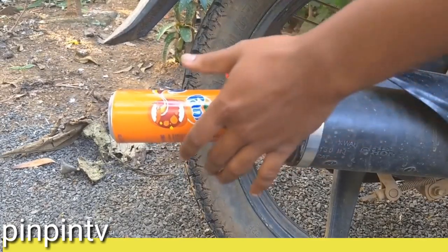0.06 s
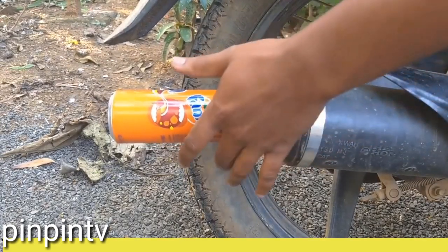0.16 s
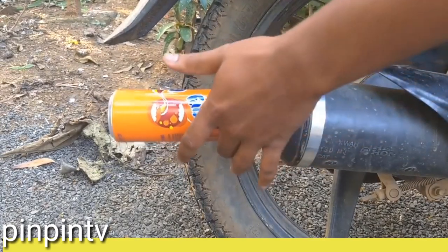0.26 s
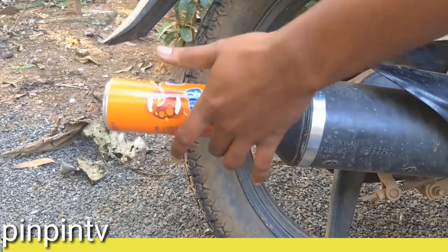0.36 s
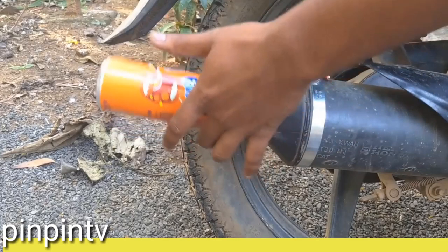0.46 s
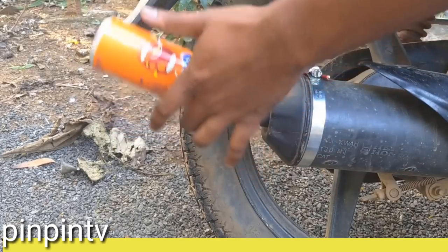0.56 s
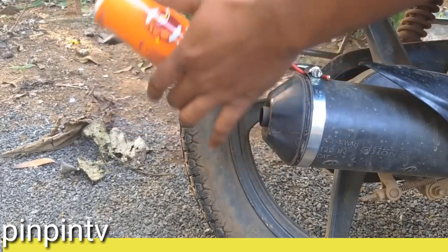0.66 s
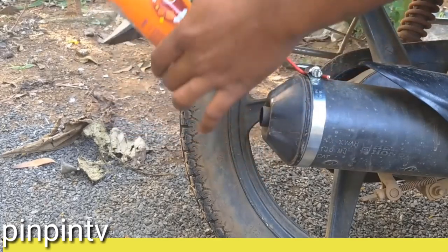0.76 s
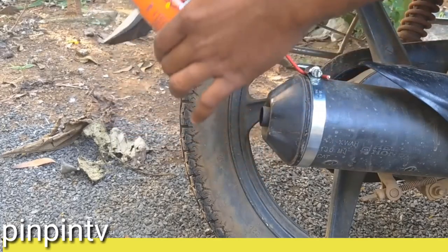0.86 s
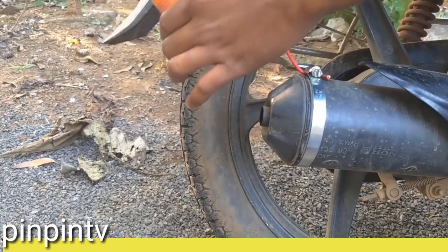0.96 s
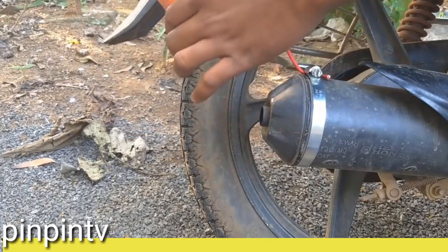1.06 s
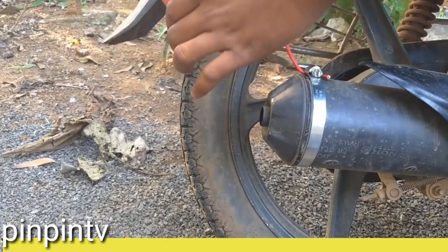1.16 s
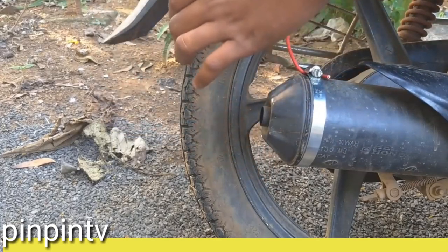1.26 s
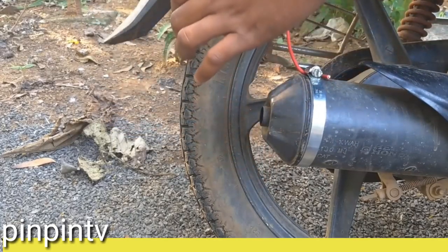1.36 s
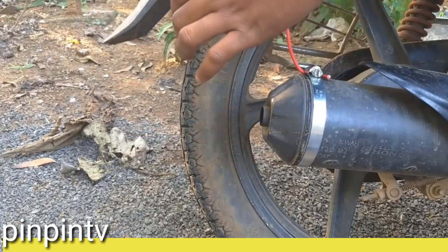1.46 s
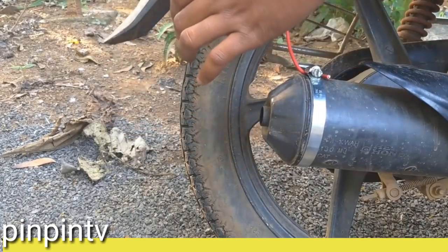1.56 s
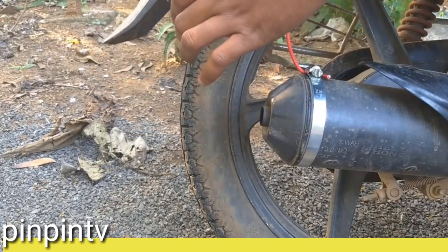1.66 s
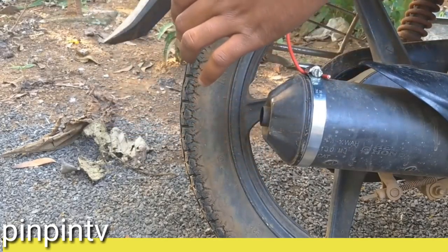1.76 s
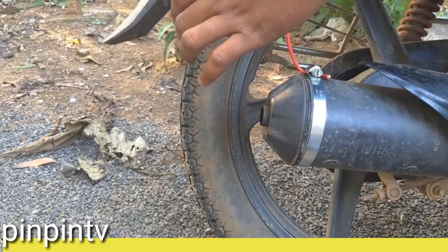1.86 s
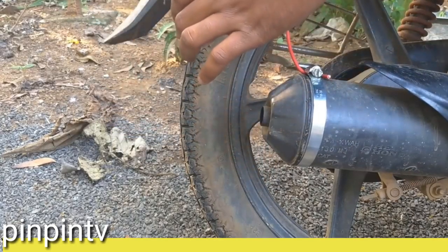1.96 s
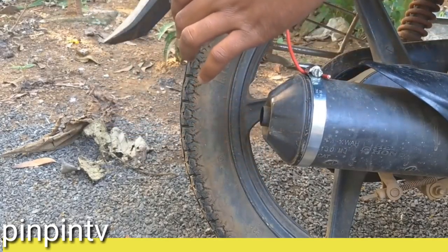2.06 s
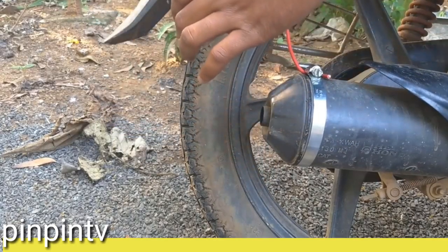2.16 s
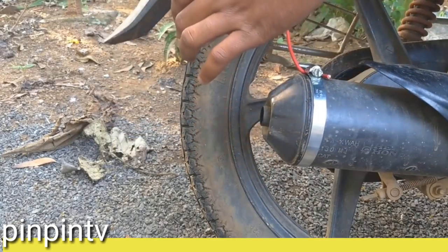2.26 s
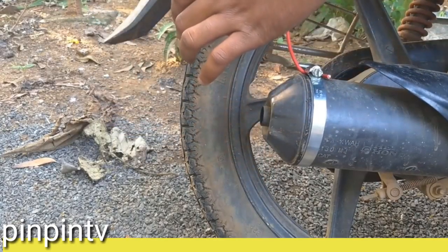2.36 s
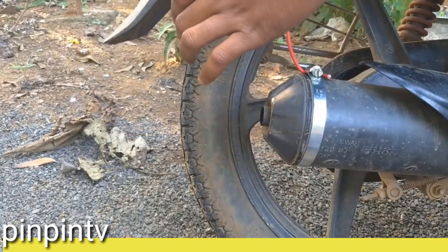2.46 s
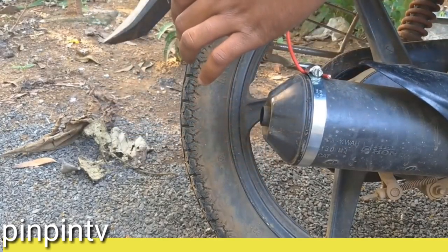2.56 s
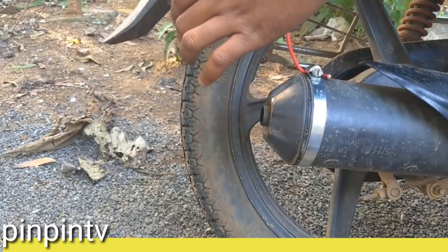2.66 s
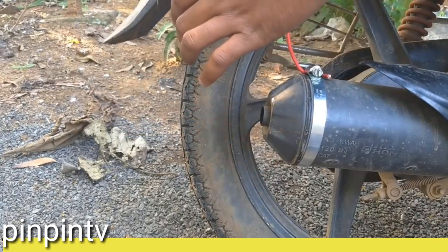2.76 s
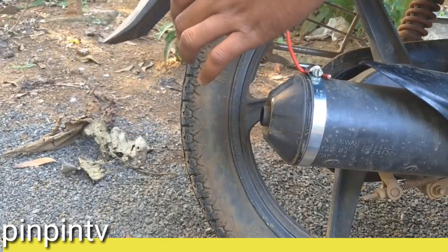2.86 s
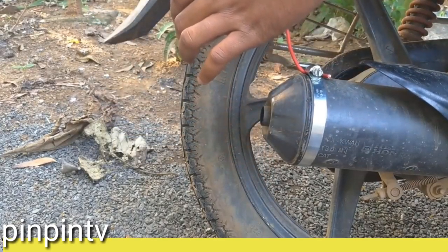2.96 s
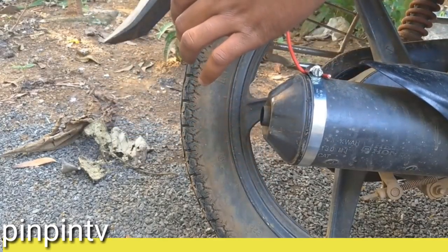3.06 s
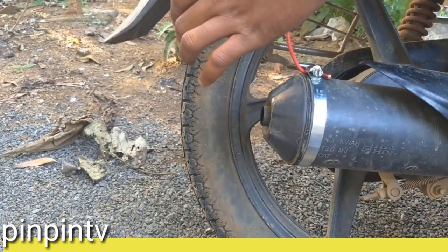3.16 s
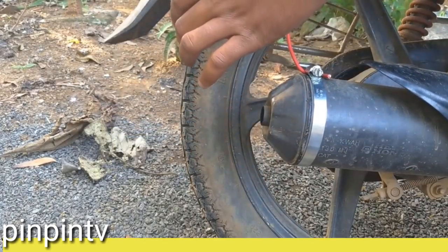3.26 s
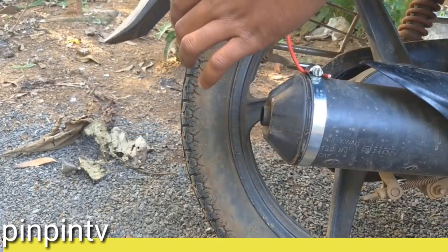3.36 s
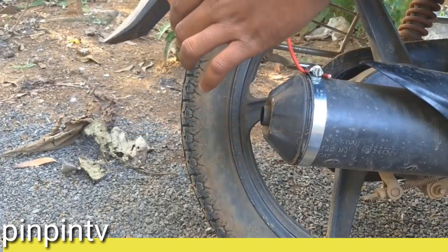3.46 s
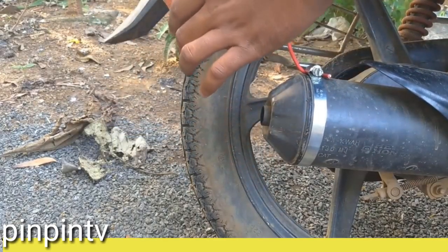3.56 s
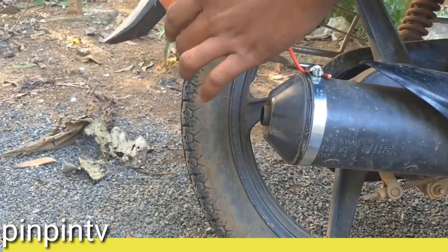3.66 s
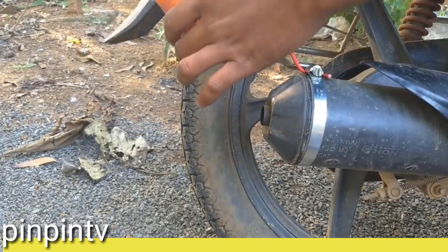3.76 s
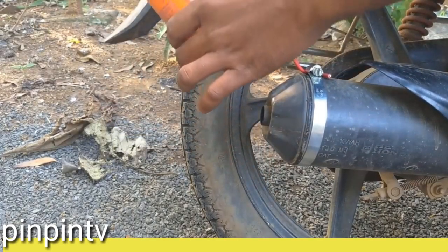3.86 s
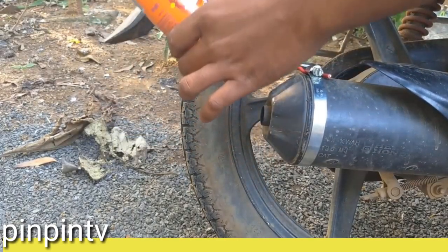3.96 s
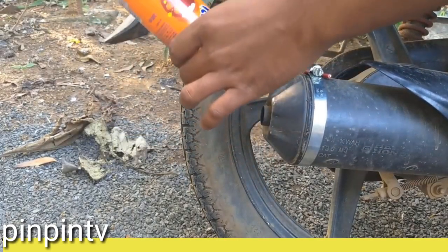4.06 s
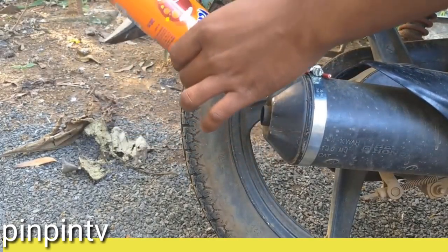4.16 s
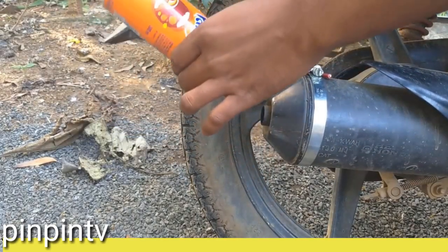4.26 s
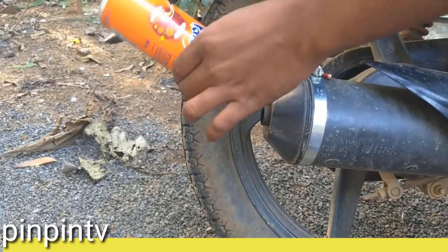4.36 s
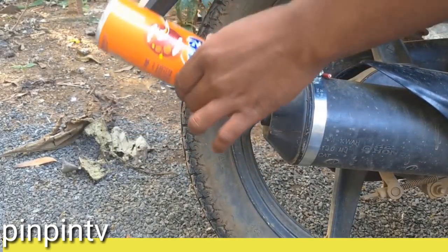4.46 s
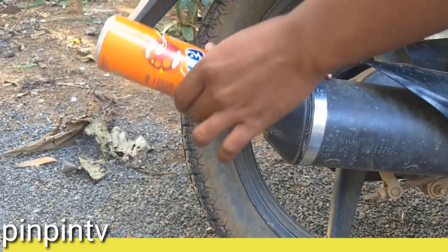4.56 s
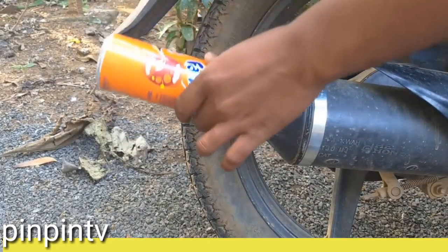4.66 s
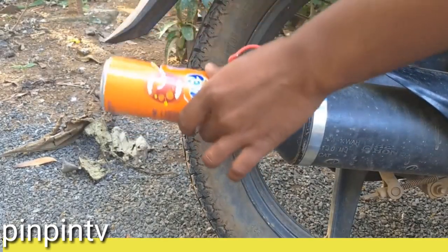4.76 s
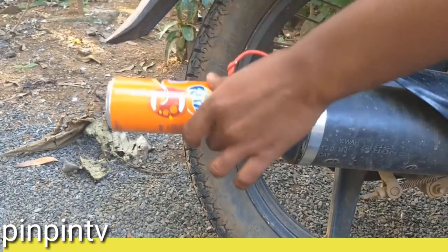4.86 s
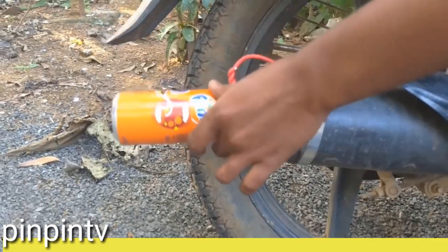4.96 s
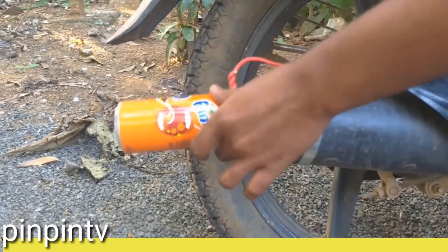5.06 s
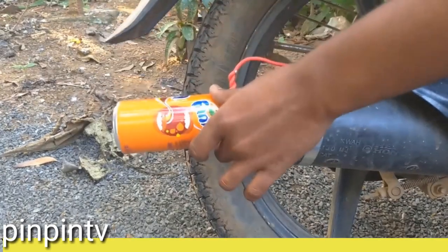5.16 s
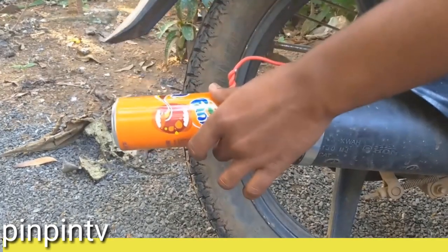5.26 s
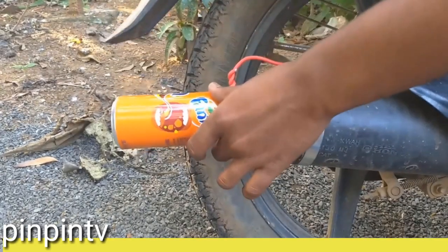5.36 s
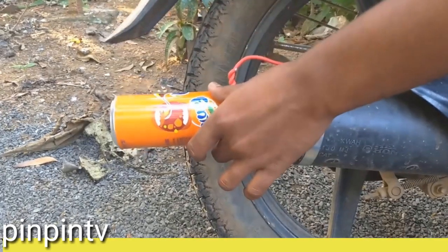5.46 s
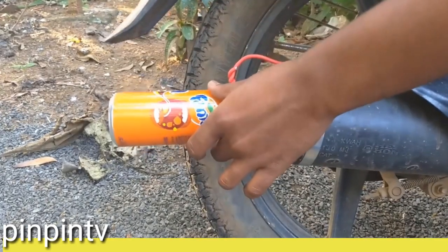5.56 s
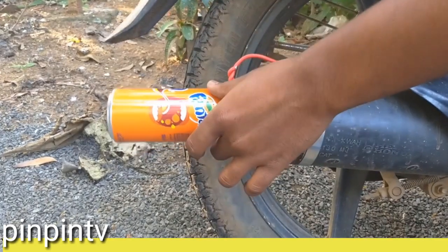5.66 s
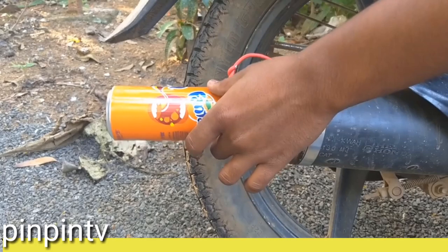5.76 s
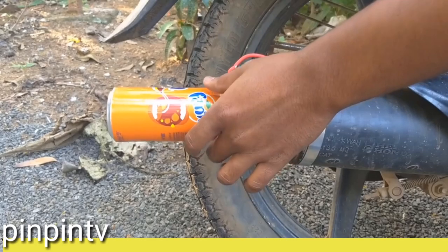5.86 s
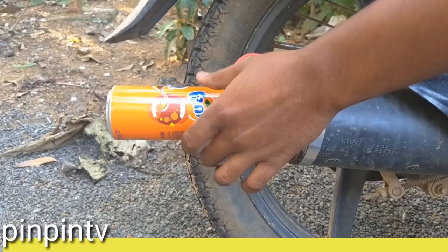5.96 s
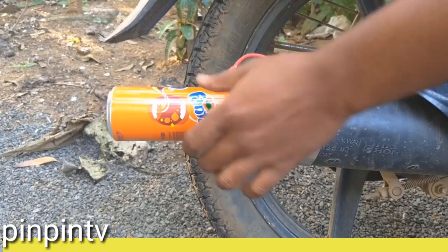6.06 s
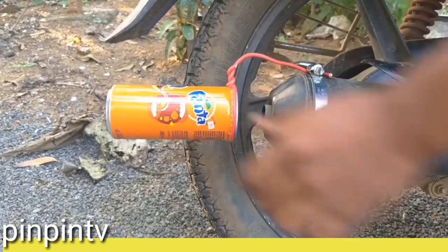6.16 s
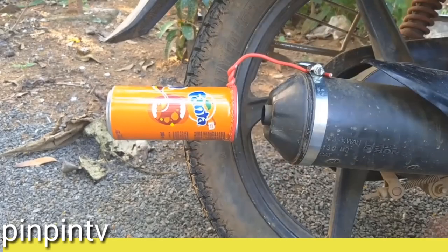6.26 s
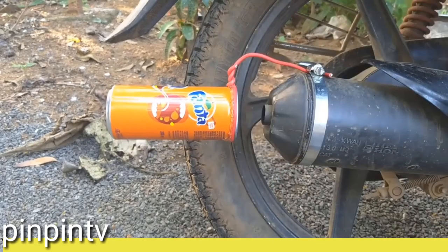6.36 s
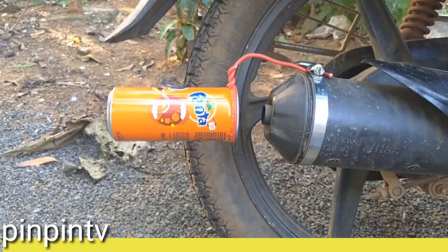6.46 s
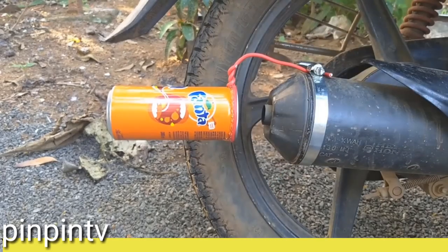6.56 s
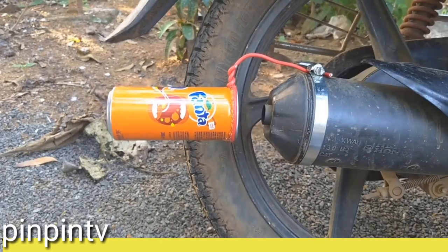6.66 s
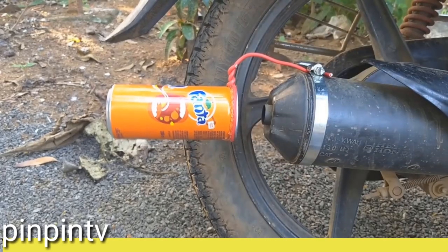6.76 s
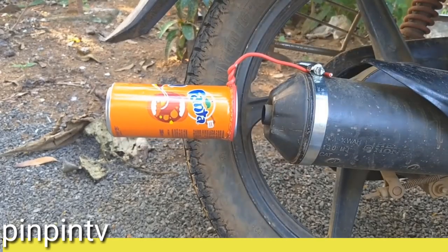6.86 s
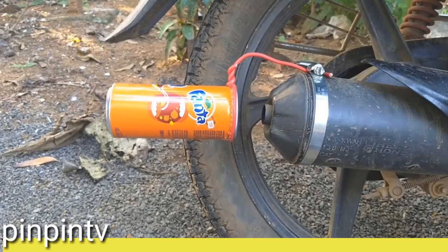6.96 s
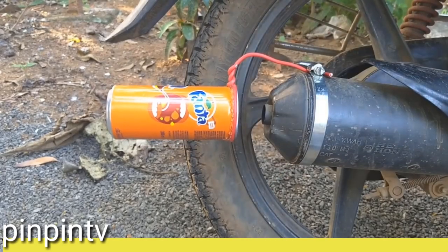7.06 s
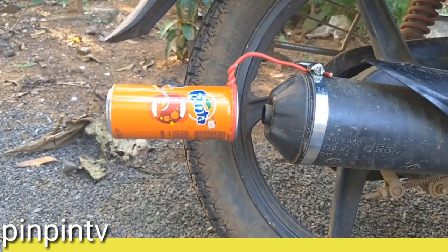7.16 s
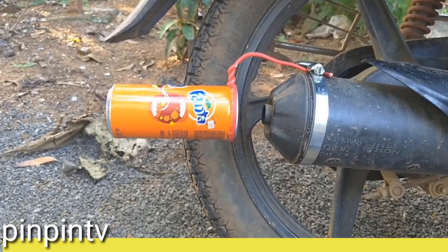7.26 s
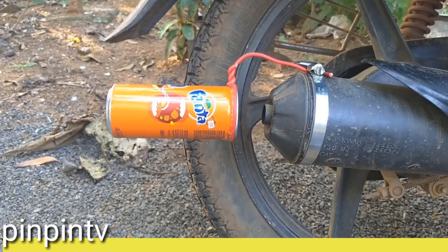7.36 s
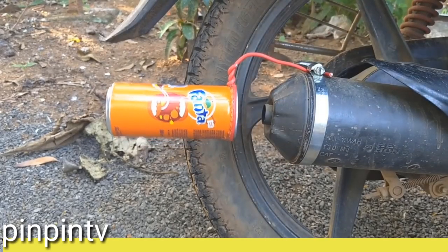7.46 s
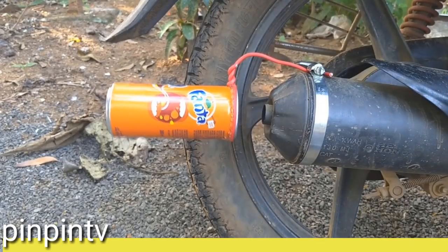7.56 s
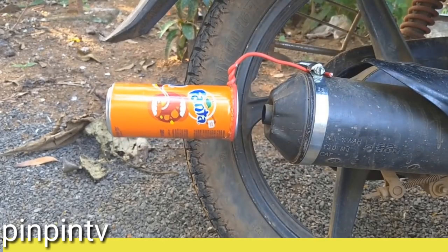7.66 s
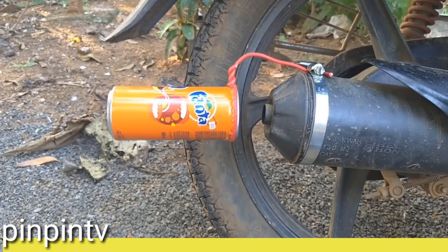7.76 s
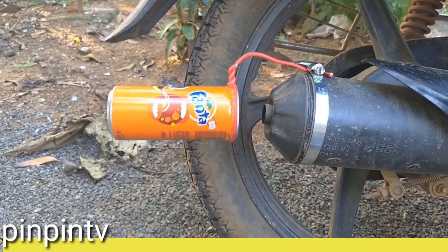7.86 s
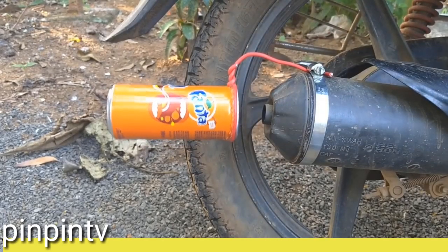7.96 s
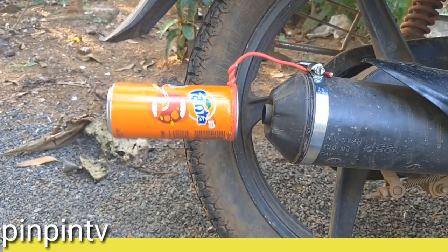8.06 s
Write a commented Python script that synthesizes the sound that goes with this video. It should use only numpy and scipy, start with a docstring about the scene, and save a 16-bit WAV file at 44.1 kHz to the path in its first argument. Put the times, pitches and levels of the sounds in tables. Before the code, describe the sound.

A single-cylinder motorcycle engine thumps with a drink can over its tailpipe, ringing hollow, then barks bare through three revs before the can returns.

```python
"""Motorcycle with a can over its tailpipe

A single-cylinder engine runs outdoors. Each firing knocks the air in an empty drink can, which rings hollow.
The can is lifted away for three blips of the throttle, then put back for idling and two more blips.
Thumps are short swings of pressure, the can and pipe are ringing tones, and gas and valves are shaped noise.
"""
import sys
import numpy as np
from scipy import signal
from scipy.fft import rfft, irfft
from scipy.io import wavfile

SR = 44100
rng = np.random.default_rng(int(sys.argv[2]) if len(sys.argv) > 2 else 0)


def digitize_waveform(pressure):
    """Quantize a signal to 16-bit integers and store it at the path in sys.argv[1].

    Rows of a 2-D input are taken as channels; values are limited to [-1, 1].
    """
    field = np.atleast_2d(pressure).T
    bounded = np.clip(field, -1, 1)
    quanta = np.round(bounded * 32767).astype(np.int16)
    wavfile.write(sys.argv[1], SR, quanta)


N = 357210
TIME = np.arange(N) / SR
FREQS = np.maximum(np.arange(N // 2 + 1) * SR / N, 1)

# The can is struck, pop by pop; these levels are starting points for each layer:
# time_s, ring_db, bark_db, ping_db, thump_db
POPS = [(0.0, -17.5, -24, -49, -27), (0.0488, -13, -33, -22, -22), (0.1114, -16, -13.5, -34.0, -22),
        (0.1823, -15, -18.5, -23, -22), (0.2452, -14, -23, -35, -18.5), (0.3412, -13.5, -16.5, -30, -19.5),
        (0.412, -9.5, -15, -25, -20.5), (0.5018, -8.5, -17, -25, -22.5), (0.5891, -8, -14, -26, -26.5),
        (0.6616, -9.5, -28, -21, -25), (0.724, -16.5, -20, -17.5, -23), (0.784, -11.5, -23, -32, -21),
        (0.8381, -11.5, -26, -26, -20), (0.8875, -15.5, -26, -45, -17.5), (0.9355, -21.5, -30, -51, -20),
        (4.1774, -26, -38.0, -52, -20), (4.231, -34, -45, -46.0, -20), (4.284, -22.5, -33, -32, -20.5),
        (4.3418, -23, -36.0, -36, -26), (4.4057, -22.0, -23, -38, -18), (4.457, -15.5, -18, -38.0, -18),
        (4.5328, -24.5, -28.0, -29, -18.5), (4.5937, -11, -26, -30, -18), (4.6748, -27.5, -39, -47, -41),
        (4.745, -19, -40, -45, -21), (4.82, -10, -15.5, -44.0, -20), (4.9001, -14, -28.0, -27, -22),
        (4.9809, -10.5, -20, -29, -18), (5.0624, -9.5, -18, -23, -17.5), (5.1423, -11, -18, -27.0, -20),
        (5.222, -9, -16, -29, -18), (5.3022, -12, -22, -28, -22), (5.3775, -11, -22, -29, -18.5),
        (5.452, -9, -14, -21, -17), (5.525, -9.5, -25, -23, -18.5), (5.5974, -11, -15, -19, -19),
        (5.6675, -10, -14.5, -22, -19), (5.7357, -10.5, -20, -26, -18), (5.8024, -9, -14, -28, -20),
        (5.8707, -10, -18, -31, -19), (5.9367, -9.0, -21, -31, -21), (6.003, -9.5, -25, -22, -20),
        (6.0684, -10.0, -28, -22, -20), (6.1353, -12.5, -33.0, -32, -23), (6.2029, -9.5, -18, -26.5, -19),
        (6.268, -9, -19, -25.5, -19.5), (6.3347, -10, -22, -31, -21), (6.4, -9, -29, -23.5, -20),
        (6.4658, -12, -30, -28, -21), (6.5298, -9, -17, -29, -20), (6.5954, -10, -19, -43, -21),
        (6.6607, -10.5, -31, -29, -21.5), (6.7267, -8.5, -14, -20, -20), (6.7928, -9, -14, -24.0, -17.5),
        (6.8586, -9, -10.5, -22, -20.5), (6.9198, -9.5, -13, -21.0, -21), (6.9742, -8.5, -11.5, -26, -24),
        (7.025, -9, -11, -21, -22), (7.0708, -8.5, -14, -20, -23.5), (7.1117, -10, -19, -34, -23.5),
        (7.1517, -11.5, -20, -25, -25), (7.193, -17.5, -39, -37.0, -25), (7.2325, -12, -32, -35, -21),
        (7.2714, -15.5, -34, -33.0, -22.5), (7.3126, -17.5, -35, -29, -21), (7.3547, -15, -31, -27, -25),
        (7.3998, -13, -24, -43, -23), (7.449, -14, -39, -45, -21.5), (7.4975, -14, -18, -36, -20.5),
        (7.552, -18, -40, -35, -22.5), (7.5957, -8.5, -7.5, -27, -24), (7.6502, -8.5, -7, -23, -26),
        (7.6995, -9, -10, -22, -20.5), (7.7438, -9, -15, -22.5, -22), (7.7847, -9.5, -17, -24, -24),
        (7.8223, -12.5, -25, -29, -25), (7.868, -24, -37, -44.0, -26), (7.9023, -14, -33, -48, -23.5),
        (7.9399, -14, -28, -39, -21), (7.9817, -16, -35, -42, -22), (8.023, -15.5, -37, -27, -22),
        (8.0664, -14, -27.0, -40.5, -24)]
# Engine speed: time_s, firings_per_s
SPEED = [(0, 16.3), (0.52, 10.4), (0.55, 11.7), (0.81, 18.6), (0.95, 24.14), (1.09, 25.53), (1.25, 26.04),
         (1.41, 25.27), (1.6, 31.77), (1.67, 30.48), (2.03, 22.52), (2.25, 28.08), (2.45, 33.06),
         (2.65, 35.06), (2.72, 33.74), (2.9, 29.27), (3.09, 24.73), (3.3, 28.98), (3.54, 35.91),
         (3.62, 34.1), (3.85, 28.18), (4.15, 19.96), (4.25, 18.5), (4.52, 14.7), (4.89, 12.3), (5.24, 12.6),
         (5.78, 14.9), (6.6, 15.5), (6.82, 14.8), (7.01, 19.9), (7.12, 26.2), (7.63, 18.5), (7.81, 26.2),
         (8.1, 23.1)]
# The engine pulls, and coasts in between: opens_s, shuts_s, charge (0-1)
THROTTLE = [(0.38, .47, 0.2), (0.47, 1.082, 0.75), (1.346, 1.618, 0.87), (1.99, 2.678, 0.87),
            (3.093, 3.577, 0.75), (4.758, 6.702, 0.48), (6.693, 7.12, 0.98), (7.538, 7.812, 0.81)]
OPEN_S, SHUT_S = 0.07, 0.03
MID_SPEED = 25  # firings per second
# The share of the steady jet that the can catches; none after the last row: time_s, share (0-1)
CAN_IN_JET = [(.7, 1), (.84, 0), (.9, 0.16), (1.05, 0), (4.06, 0.02), (4.3, 0), (4.6, 0)]

# The hand damps the can, and hot gas raises its note: time_s, pitch_hz, typical_t60_s (time to fall 60 dB)
CAN_NOTE = [(0, 567, 0.092), (.55, 554.4, 0.075), (.8, 560.4, 0.1), (4.4, 558.6, 0.084),
            (5.302, 555, 0.078), (5.9, 554.5, 0.078), (6.9, 560, 0.094), (7.4, 562, 0.098),
            (7.7, 562, 0.076), (8.1, 563, 0.1)]
# The rebound meets the ring out of step and chokes it: pop_time_s, t60_s
CHOKED = [(.1823, 0.047), (.2457, 0.048), (7.1515, 0.061)]
# A weak slug of gas fills the can slowly: ring_db, attack_s
CAN_FILL = [(-17, 0.0016), (-7.5, 0.00037)]
# Broad, short-lived air tones of the can: pitch_hz, level_db, t60_s
CAN_BODY = [(536, -17.5, 0.015), (390, 2, 0.0066)]
# Upper air tones of the can: pitch_hz, level_db, t60_s
CAN_PING = [(1689, 1.5, 0.014), (1786, -1, 0.018)]
# A steep front barks in the can's mouth: pitch_hz, level_db, t60_s
CAN_BARK = [(890, -4.5, 0.0064), (1056, -14.5, 0.018), (1190, -18, 0.0041), (1550, -10.5, 0.0019)]
BARK_LAG_S = 0.00018  # the front steepens just after the slug enters
# The can's rim whistles as it swings through the jet: loudest_s, swell_s, pitch_hz, level_db
WHISTLES = [(4.085, 0.044, 1310, -44.5), (4.29, 0.04, 1490, -46), (4.468, 0.072, 1788, -38.5)]
# What the can in the jet does to the hiss, lifting it at low speed and muffling it at high:
# firings_per_s, change_db
CAN_HISS_CHANGE = [(13, 2.5), (17, 3), (24, -10)]

# Each law below has the same columns, in the unit of its name (db, hz or s):
# at_mid_speed, per_firing_per_s, per_charge, per_both_together, per_share_of_jet_in_can
# Bare muffler: thump pitch, thump level, delay behind the firing
THUMP_HZ = (131.5, 2.5, 43, 0.6, 6)
BARE_THUMP_DB = (-16.5, 0.2742, 0.5, -0.13, -9)
THUMP_LAG_S = (.0006, 0, -.0004, 0, -0.00075)
# Behind the can: thump pitch, and the level added to each thump
COVERED_HZ = (134.5, 1.4, 30, 0.9, -0.5)
COVERED_DB = (0.61, 0, -1.1, -0.064, 1.5)
# Sharp front, slow heave and tailpipe ring of each firing
FRONT_DB = (-40, 0.2, 13.5, 0.1, 3)
HEAVE_DB = (-43, -0.6, -10, -1, 1)
TAILPIPE_DB = (-44.5, 0.08, 16, 0, -8)
# Gas roar and hiss before their trims, and the hum of the can
ROAR_DB = (-39, 0.09, 1.4, 0.6639, -1)
HISS_DB = (-42.5, 0.3375, 0.4, 0.7, -3)
HUM_DB = (-40, 0.86, -2.5, 1, 6.5)

# A coasting thump is one short push; a loaded one swings on and sags more in pitch:
# charge (0-1), swell_cycles, crest_cycles, decay_cycles, pitch_sag (share)
THUMP_SHAPE = [(0, 0.34, -0.41, 1.23, 0.14), (.85, .48, 0.016, 1.65, .2)]
# The same with the can in front of the pipe, with its own sag
COVERED_SHAPE = [(0, 0.23, -0.33, 1.6, 0.066), (.6, 0.48, 0.51, 1.6, 0.047), (1, .4, 0.16, 1, 0.13)]
# A weak slug reaches the can late, so its thump runs ahead of the knock: ring_db, thump_lag_s
COVERED_LAG = [(-13.5, -.002), (-11.5, 0.000054)]
THUMP_WAVER = 0.018  # share of the pitch
THUMP_SCATTER_DB = 0.3  # from one bare firing to the next
BARE_SPAN_S = (.9768, 4.15)  # the can is away: first firing, end
# The engine hunts: every second firing is weak and early
HUNTING_SPAN_S, HUNTING_LOSS_DB, HUNTING_EARLY_S = (1.16, 1.43), 2.5, 0.00208
JOLT_DB = 1  # per step in charge: thumps kick as the throttle shuts and stumble as it opens
FRONT_LEAD_S, FRONT_WIDTH_S = 0.0027, 0.0005
HEAVE_HZ, HEAVE_S, HEAVE_LAG_S = 65, 0.0095, 0.0024

# Standing waves of the open tailpipe: pitch_hz, level_db, t60_s
TAILPIPE = [(439, 2.5, 0.06), (490, -6, 0.04), (804, -6, 0.14), (1040, -2, 0.037), (1300, -3, 0.061)]
# Narrow peaks and dips of pipe and muffler shell: pitch_hz, boost_db
PIPE = [(441, 6.5), (840, 5), (997, 6.5), (1288, 6.5), (1572, -3), (1787, -1), (2335, 2.5), (2668, 8),
        (2858, 7.5), (3090, 9), (3430, 5.5), (3770, 8), (4255, 12), (4875, 11), (5220, 9.5)]
# Colour of the gas's low roar: pitch_hz, level_db (per Hz)
ROAR = [(30, -23), (60, 1), (130, 7), (220, 5.5), (300, -3), (450, -2), (650, 0.5), (1000, -0.5),
        (1400, -5.5), (1900, -10), (2600, -18), (5000, -41.5)]
# Colour of the gas's hiss: pitch_hz, level_db (per Hz)
HISS = [(1000, -17), (1900, 1), (2500, 0.5), (3200, -3), (4000, -4.5), (5000, -11), (6000, -11),
        (8000, -17.5), (10000, -16), (13000, -22.5), (15500, -20.5)]
# The valves clack at fixed points of the cycle: share_after_firing (0-1), level_db, decay_s
VALVES = [(.655, -41.5, .0024), (.712, -44.5, .002), (.965, -42.5, .0028)]
VALVE_BAND_HZ = (3200, 11000)

# Balance of the microphone pair: pitch_hz, left_minus_right_db
BALANCE = [(30, -12), (70, 4), (200, 6.5), (380, 1.3), (560, 2.5), (800, -1.5), (1300, 0.5), (2400, -0.5),
           (15000, 0)]
# Sound scattered by ground and bike, unrelated to the direct sound: pitch_hz, gain_db
DIFFUSE = [(40, -25), (130, -0.5), (560, -10.5), (1000, -16.5), (2500, -11.5), (8000, -5.5), (15000, -22.5)]
PHASE_TURN_HZ = 2310  # the pair's phase turns once in this many hertz
CUTOFF_HZ = 15550


def from_db(db):
    """Turn decibels into gain."""
    return 10 ** (np.asarray(db) / 20)


def rms_one(x):
    """Scale to unit power."""
    return x / np.sqrt(np.mean(x ** 2) + 1e-20)


def in_time(rows, at=TIME):
    """Read the columns of a curve at the given times."""
    s, *columns = np.transpose(rows)
    return [np.interp(at, s, column) for column in columns]


def over_hz(points):
    """Spread a spectrum table over all frequencies."""
    hz, value = np.transpose(points)
    return np.interp(np.log(FREQS), np.log(hz), value)


def coloured(x, db):
    """Filter x with a spectrum and scale it to unit power."""
    return rms_one(irfft(rfft(x) * from_db(db), N))


def band(x, order, edges_hz):
    """Keep the sound between two frequencies."""
    return signal.sosfilt(signal.butter(order, edges_hz, "band", fs=SR, output="sos"), x)


def slow_noise(corner_hz):
    """Unit-power noise that mostly wanders below the corner."""
    return coloured(rng.standard_normal(N), -20 * np.log10(1 + (FREQS / corner_hz) ** 2))


def clicks(times, heights):
    """Place one impulse at each time."""
    places = np.clip(np.round(times * SR).astype(int), 0, N - 1)
    return np.bincount(places, heights * np.ones(len(times)), N)


def ring(x, hz, t60):
    """Let a unit click set a sine ringing that falls 60 dB in t60 seconds."""
    r, w = np.exp(-np.log(1000) / (t60 * SR)), 2 * np.pi * hz / SR
    return signal.lfilter([0, np.sin(w)], [1, -2 * r * np.cos(w), r * r], x + 1e-18)


def fading(x, decay_s):
    """Give each impulse an exponential tail."""
    return signal.lfilter([1], [1, -np.exp(-1 / (decay_s * SR))], x + 1e-18)


def charge(at):
    """How full the cylinder is: the throttle opens and shuts in short ramps."""
    pulls = []
    for opens, shuts, full in THROTTLE:
        ramp = np.minimum((at - opens) / OPEN_S, 1 + (shuts - at) / SHUT_S)
        pulls.append(full * np.clip(ramp, 0, 1))
    return np.max(pulls, axis=0)


def cover(at):
    """The share of the steady jet that the can catches."""
    return np.clip(in_time(CAN_IN_JET, at)[0], 0, 1)


def law(rule, at=TIME):
    """A value that follows engine speed, charge and the place of the can."""
    base, by_speed, by_charge, by_both, by_can = rule
    faster = in_time(SPEED, at)[0] - MID_SPEED
    return base + by_speed * faster + charge(at) * (by_charge + by_both * faster) + by_can * cover(at)


def bare_firings():
    """Count engine cycles while the can is away: one firing each, with its time and thump level."""
    cycles = np.cumsum(in_time(SPEED)[0]) / SR
    first, last = np.interp(BARE_SPAN_S, TIME, cycles)
    times = np.interp(np.arange(first, last), cycles, TIME)
    every_second = np.arange(len(times)) % 2
    weak = every_second * (times > HUNTING_SPAN_S[0]) * (times < HUNTING_SPAN_S[1])
    step = np.diff(charge(times), prepend=charge(times[:1]))
    level_db = law(BARE_THUMP_DB, times) - HUNTING_LOSS_DB * weak - JOLT_DB * step
    return times - HUNTING_EARLY_S * weak, level_db + THUMP_SCATTER_DB * rng.standard_normal(len(times))


def flywheel(pop_s):
    """The engine turns more evenly than the can answers: smooth the times of each run of pops."""
    runs = np.split(pop_s, [np.searchsorted(pop_s, BARE_SPAN_S[0])])
    return np.concatenate([signal.savgol_filter(run, 5, 2) for run in runs])


def can(pop_s, ring_db, ping_db, rebound_s=0.00698, rebound=0.22, lead_s=0.0073, lead_db=-18.0,
        low_hz=370, high_hz=1000, note_db=0.5, length_scatter=0.15):
    """Each slug of gas knocks the air in the can; the muffler's rebound knocks again, more weakly."""
    hollow, age = np.zeros(N + SR), TIME[:SR // 8]
    for s, db, hz, t60 in zip(pop_s, ring_db, *in_time(CAN_NOTE, pop_s)):
        start = max(round(s * SR), 0)
        free_t60 = t60 * np.exp(length_scatter * rng.standard_normal())
        t60 = next((short for at, short in CHOKED if abs(at - s) < .01), free_t60)
        fill = 1 - np.exp(-age / np.interp(db, *np.transpose(CAN_FILL)))
        fade = np.exp(-np.log(1000) * age / t60)
        hollow[start:start + len(age)] += from_db(db + note_db) * fill * fade * np.sin(2 * np.pi * hz * age)

    # Weak firings knock the broad tones less than they ring the main note
    hardness = np.interp(ring_db, [-17, -7], [.4, 1.15])
    knocks = clicks(pop_s, hardness * from_db(ring_db))
    rebound_times = pop_s + rebound_s + rng.normal(0, .0001, len(pop_s))
    knocks = knocks + clicks(rebound_times, rebound * from_db(ring_db + 2 * rng.standard_normal(len(pop_s))))
    hollow = hollow[:N] + sum(from_db(db) * ring(knocks, hz, t60) for hz, db, t60 in CAN_BODY)
    hollow = band(hollow, 2, [low_hz, high_hz])

    # A steep front also wakes the upper tones, and a small spit runs ahead of it
    for k, (hz, db, t60) in enumerate(CAN_PING):
        strength = from_db(ping_db[:, None] + db + rng.normal(0, 2.35, (len(pop_s), 2)))
        front = clicks(pop_s, strength[:, 0]) + clicks(pop_s - lead_s, strength[:, 1] * from_db(lead_db))
        hollow = hollow + (-1) ** k * ring(front, hz, t60)
    return hollow


def barks(pop_s, bark_db, ring_db, least_db=-20.5):
    """A hard firing steepens into a shock that barks in the can; every ring brings at least a little."""
    shocks = clicks(pop_s + BARK_LAG_S, from_db(bark_db) + from_db(ring_db + least_db))
    return sum(ring(shocks * from_db(db), hz, t60) for hz, db, t60 in CAN_BARK)


def spits(pop_s, bark_db, level_db=-25.0, decay_s=0.0052, edge_hz=2600):
    """Each pop carries a short burst of bright noise, loudest on the hardest pops."""
    strength = from_db(bark_db + level_db + rng.normal(0, 1, len(pop_s)))
    burst = fading(clicks(pop_s, strength), decay_s)
    return band(burst * rng.standard_normal(N), 1, [edge_hz, 8000])


def muffler(firings, level_db, lag_s, pitch_law, shape_table):
    """The low beat of the exhaust: pressure swells within a cycle, then swings out with sagging pitch."""
    out, chance = np.zeros(N), rng.standard_normal(len(firings))
    pitch = law(pitch_law, firings) * np.exp(THUMP_WAVER * chance)
    shapes = in_time(shape_table, charge(firings))
    for s, db, hz, swell, crest, decay, sag in zip(firings + lag_s, level_db, pitch, *shapes):
        near = slice(max(int((s - .03) * SR), 0), int((s + .07) * SR))
        cycles = (TIME[near] - s) * hz
        width = np.where(cycles < crest, swell, decay)
        envelope = np.exp(-np.abs((cycles - crest) / width) ** 1.4)
        sagged = cycles * (1 - sag * np.abs(cycles) / (1 + np.abs(cycles)))
        out[near] += from_db(db) * envelope * np.sin(2 * np.pi * sagged)
    return out


def fronts(bare_s):
    """With the can away, each thump opens with a sharp push and pull that gives the engine its chug."""
    widths = np.arange(-SR // 200, SR // 200 + 1) / SR / FRONT_WIDTH_S
    pulse = -widths * np.exp((1 - widths ** 2) / 2)
    strength = from_db(law(FRONT_DB, bare_s) + rng.normal(0, 0.76, len(bare_s)))
    return signal.fftconvolve(clicks(bare_s - FRONT_LEAD_S, strength), pulse, "same")


def tailpipe(bare_s):
    """With the can away, each firing rings the open pipe, hardest under load."""
    force_db = law(TAILPIPE_DB, bare_s)
    out = np.zeros(N)
    for hz, db, t60 in TAILPIPE:
        strength = from_db(force_db + db + rng.normal(0, 2.7, len(bare_s)))
        out += ring(clicks(bare_s, strength), hz, t60)
    return out


def heave(firings):
    """The whole volume of the muffler swings briefly with each firing, below the thump."""
    lag = np.arange(-SR // 20, SR // 20 + 1) / SR
    swing = np.exp(-(lag / HEAVE_S) ** 2) * np.sin(2 * np.pi * HEAVE_HZ * lag)
    return signal.fftconvolve(clicks(firings + HEAVE_LAG_S, from_db(law(HEAVE_DB, firings))), swing, "same")


def blown_can(hum_hz=559, hum_t60=0.24):
    """Turbulence at the mouth makes the can hum for as long as it catches the jet."""
    hum = rms_one(ring(ring(rng.standard_normal(N), hum_hz, hum_t60), hum_hz, 0.0075))
    return hum * cover(TIME) * from_db(law(HUM_DB))


def whistles(wander_hz=9.1, flutter_db=4.0, airy=0.31, airy_t60=.025):
    """The jet grazes the rim: a wavering, airy note swells and fades, each one higher than the last."""
    out = np.zeros(N)
    for s, swell_s, hz, db in WHISTLES:
        unrest = slow_noise(55)
        note = np.sqrt(2) * np.sin(2 * np.pi * np.cumsum(hz + wander_hz * unrest) / SR)
        air = rms_one(ring(rng.standard_normal(N), hz, airy_t60))
        swell = 1 / (1 + ((TIME - s) / swell_s) ** 4)
        out += rms_one(note + airy * air) * from_db(db + flutter_db * unrest) * swell
    return out


def valves(firings, scatter_db=1.4):
    """The valve gear ticks brightly between the firings and just before each."""
    starts, periods = firings[:-1], np.diff(firings)
    bursts = np.zeros(N)
    for share, db, decay_s in VALVES:
        strength = from_db(db + scatter_db * rng.standard_normal(len(starts)))
        bursts += fading(clicks(starts + share * periods, strength), decay_s)
    return band(bursts * rng.standard_normal(N), 1, VALVE_BAND_HZ)


def gas(firings, roar_trim_db=3.0, hiss_trim_db=4.5, roar_throb=0.48, hiss_throb=0.53, roar_repeat=0.49,
        hiss_repeat=0.099, width_hz=24, roar_lag_s=-0.0094, hiss_lag_s=0.00045, gust_db=1.5):
    """Turbulent gas surges around each firing, gusts in between and sounds through the pipe's resonances."""
    beats = clicks(firings, from_db(rng.normal(0, 1.0, len(firings))))
    pipe_db = sum(db / (1 + ((FREQS - hz) / width_hz) ** 2) for hz, db in PIPE)
    # Echoes inside the muffler change only slowly between firings, which gives the roar a trace of pitch
    age = TIME[:SR // 10]
    echoes = rng.standard_normal((2, len(age))) * np.sqrt(age) * np.exp(-age / 0.014)
    first, second = signal.fftconvolve(beats[None], echoes, axes=1)[:, :N]
    rattle = rms_one(first * np.cos(2 * np.pi * TIME) + second * np.sin(2 * np.pi * TIME))

    def rush(spectrum, throb, lag_s, rise_s, repeat):
        """Noise that swells and dies with each slug of gas."""
        slugs = clicks(firings + lag_s, from_db(rng.normal(0, 2.9, len(firings))))
        surge = signal.fftconvolve(slugs, age / rise_s * np.exp(1 - age / rise_s))[:N]
        gusts = from_db(gust_db * slow_noise(70))
        noise = rng.standard_normal(N) * (1 + throb * surge)
        return coloured(gusts * (noise + repeat * rattle), over_hz(spectrum) + pipe_db)

    roar = rush(ROAR, throb=roar_throb, lag_s=roar_lag_s, rise_s=0.0048, repeat=roar_repeat)
    hiss = rush(HISS, throb=hiss_throb, lag_s=hiss_lag_s, rise_s=0.0054, repeat=hiss_repeat)
    can_db = cover(TIME) * np.interp(in_time(SPEED)[0], *np.transpose(CAN_HISS_CHANGE))
    roar_level = from_db(law(ROAR_DB) + roar_trim_db)
    return roar * roar_level + hiss * from_db(law(HISS_DB) + hiss_trim_db + can_db)


def microphones(direct, stray, bass_lag=1.0, notch=0.3):
    """A spaced pair: closer in step in the bass, swinging in and out of phase through the treble."""
    turn = np.maximum(2 * np.pi * FREQS / PHASE_TURN_HZ - np.pi, 0)
    phase = turn - notch * np.sin(2 * turn) - bass_lag * np.exp(-FREQS / 550)
    sides = np.array([[1], [-1]])  # left, right
    balance = from_db(sides * over_hz(BALANCE) / 2)
    ports = balance * np.exp(1j * phase * np.array([[0], [-1]]))
    # Stray sound is added with opposite sign on the two sides
    scattered = sides * rfft(stray) * from_db(over_hz(DIFFUSE))
    return irfft(ports * (rfft(direct) + scattered), N)


def scene():
    """Can, muffler, valves and gas, heard by a pair of microphones."""
    pop_s, ring_db, bark_db, ping_db, thump_db = np.transpose(POPS)
    bare_s, bare_db = bare_firings()
    firings = np.sort(np.concatenate([pop_s, bare_s]))

    bare = muffler(bare_s, bare_db, law(THUMP_LAG_S, bare_s), THUMP_HZ, THUMP_SHAPE)
    bare = bare + fronts(bare_s) + tailpipe(bare_s)
    covered_db = thump_db + law(COVERED_DB, pop_s)
    covered_lag_s = np.interp(ring_db, *np.transpose(COVERED_LAG))
    covered = muffler(flywheel(pop_s), covered_db, covered_lag_s, COVERED_HZ, COVERED_SHAPE)

    tin = can(pop_s, ring_db, ping_db) + barks(pop_s, bark_db, ring_db) + spits(pop_s, bark_db)
    tin = tin + blown_can() + whistles()
    direct = bare + covered + heave(firings) + tin + valves(firings) + gas(firings)
    return microphones(direct, stray=gas(firings) + valves(firings))


def record(dry, rumble_hz=43):
    """Cut the rumble and the very top."""
    dry = irfft(rfft(dry) / np.sqrt(1 + (rumble_hz / FREQS) ** 10), N)
    return signal.sosfilt(signal.ellip(12, .1, 90, CUTOFF_HZ, fs=SR, output="sos"), dry)


dry = scene()
out = record(dry)
digitize_waveform(out)
```